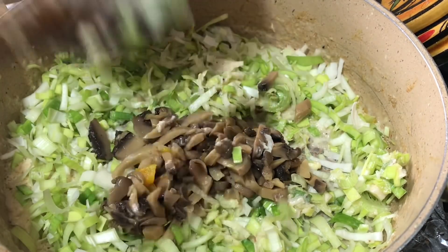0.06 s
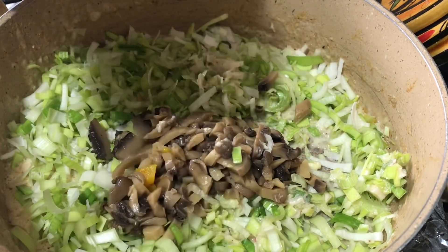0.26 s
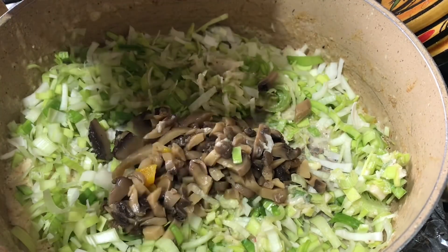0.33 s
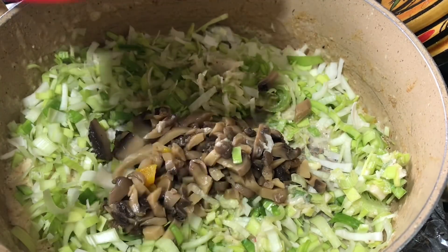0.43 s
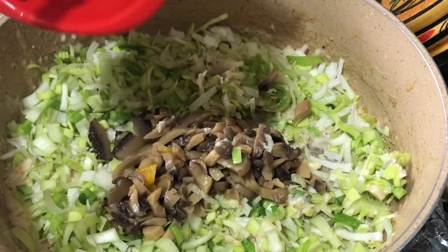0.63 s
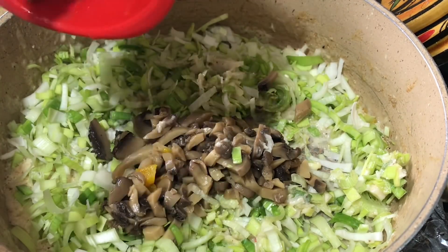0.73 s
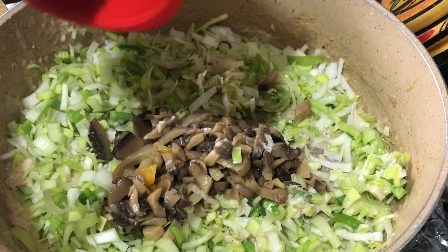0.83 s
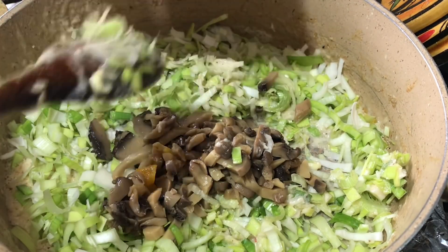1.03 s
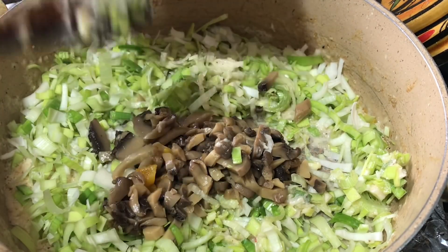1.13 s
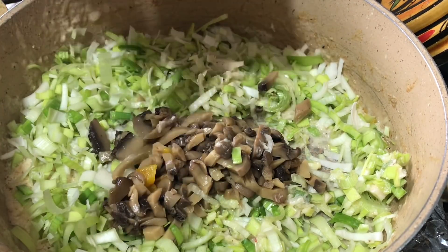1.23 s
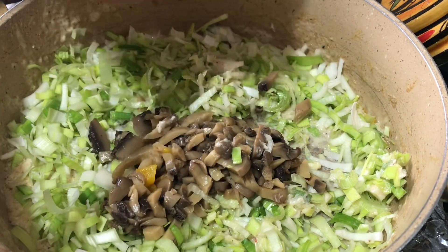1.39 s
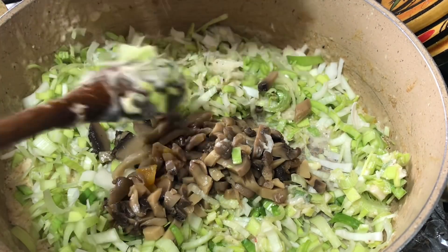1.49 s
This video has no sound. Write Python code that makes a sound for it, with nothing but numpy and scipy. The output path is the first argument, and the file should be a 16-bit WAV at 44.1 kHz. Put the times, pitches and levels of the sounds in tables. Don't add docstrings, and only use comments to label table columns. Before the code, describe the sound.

A wooden spoon knocks twice on a heavy pan rim over faintly sizzling vegetables

```python
import sys
import numpy as np
from scipy import signal
from scipy.fft import rfft, irfft, next_fast_len
from scipy.io import wavfile
from scipy.ndimage import map_coordinates

SR = 44100
rng = np.random.default_rng(int(sys.argv[2]) if len(sys.argv) > 2 else 0)


def to_wav(s):
    ch = np.atleast_2d(s).T
    pcm = np.round(np.clip(ch, -1, 1) * 32767)
    wavfile.write(sys.argv[1], SR, pcm.astype(np.int16))


def ratio_of_db(decibels):
    return 10 ** (np.asarray(decibels, float) / 20)


N = 68355


def unit(x):
    return x / np.sqrt(np.mean(x ** 2) + 1e-20)


def along(points, hz):
    point_hz, value = np.transpose(points)
    return np.interp(np.log(hz + 1), np.log(point_hz + 1), value)


def curves(rows):
    time_s, *columns = np.transpose(rows)
    return [np.interp(np.arange(N) / SR, time_s, column) for column in columns]


def wobble(rate):
    return map_coordinates(rng.standard_normal(64), [np.arange(N) * rate / SR])


def noise():
    return rng.standard_normal(N)


def coloured(x, points):
    size = next_fast_len(N + 8192)
    gain = ratio_of_db(along(points, np.fft.rfftfreq(size, 1 / SR)))
    return irfft(rfft(x, size) * gain, size)[:N]


def spoon():
    # start_s, peak_db, spot on the rim (0-1), contact_s, crack_db
    knocks = [
        (0.2235, -1.5, 0, 0.0013, -33),
        (1.263, -3, 1, 0.00098, -36.5),
    ]
    # pitch_hz, level_db at one spot, level_db at the other, t60_s
    wood = [(155, -30.5, -27.5, 0.091), (252.5, -28, -30, 0.1), (570, -13, -13.5, 0.06),
            (802, -6.5, -17, 0.02), (957, -24, -29, 0.096), (1075, -9.5, -10, 0.026),
            (1155, -0.5, -1.5, .016), (1176, -23, -16, 0.036), (1287, -10.5, -15, 0.011),
            (1503, -23.5, -23, 0.025), (1754, -24, -31.5, 0.031), (1882, -24.5, -26.5, 0.038),
            (2140, -28, -27.5, 0.019), (2545, -19.5, -24.5, 0.016)]
    # pitch_hz, level_db at one spot, level_db at the other, t60_s
    rim = [(4135, -4.5, -7, 0.022), (4370, -11, 2, 0.013), (5280, -7.5, -9.5, 0.021),
           (6000, -22, -1.5, 0.012), (6530, 1, -5.5, 0.011), (8200, -3, -10, 0.0068),
           (11500, -11, -20, .008)]
    # pitch_hz, level_db at one spot, level_db at the other, t60_s
    tap = [(590, -41.5, -44, 0.089), (860, -31.5, -32, 0.0066), (1120, -43.5, -43, 0.022)]
    # delay_s, level_db
    walls = [(.0135, -15.5), (.021, -27.5), (.033, -28.5), (.045, -25)]
    tap_s, room_delay_s, room_db = 0.589, 0.007, -14.5
    grit_db, grit_t60_s = -9, 0.0082

    out = np.zeros(N + SR)
    t = np.arange(SR // 4) / SR
    for start_s, peak_db, spot, contact_s, crack_db in knocks:
        body = ratio_of_db(peak_db) * ring(wood, t, spot, contact_s)
        grit = np.diff(rng.standard_normal(len(t) + 1)) * ratio_of_db(grit_db - 60 * t / grit_t60_s)
        crack = ratio_of_db(crack_db) * (grit + ring(rim, t, spot, contact_s=0.00061))
        blow = crack - body
        for delay_s, level_db in [(0, 0.012)] + walls:
            first = round((start_s + delay_s * (1 + 0.1 * spot)) * SR)
            out[first:][:len(t)] += ratio_of_db(level_db) * blow
        echo = ratio_of_db(room_db) * kitchen(blow)
        out[round((start_s + room_delay_s) * SR):][:len(echo)] += echo
    out[round(tap_s * SR):][:len(t)] -= ring(tap, t, spot=0, contact_s=0.00019)
    return signal.lfilter(*signal.butter(2, 110, "high", fs=SR), out[:N])


def ring(modes, t, spot, contact_s):
    out = 0
    for pitch_hz, one_db, other_db, t60_s in modes:
        swell_s = contact_s * max(1, 1000 / pitch_hz)
        swell = 1 - np.exp(-(t / swell_s) ** 2)
        decay = ratio_of_db(one_db + (other_db - one_db) * spot - 60 * t / t60_s)
        out = out + decay * swell * np.sin(2 * np.pi * pitch_hz * t)
    return out


def kitchen(x):
    # pitch_hz, t60_s, level_db
    room = [(200, 0.11, -5), (600, .14, -5), (800, 0.2, 2), (1200, 0.31, -3), (1720, 0.28, 10.5),
            (2500, 0.17, 3), (5300, 0.13, 5.5)]
    hz, t, bands = signal.stft(rng.standard_normal(SR // 3), SR, nperseg=256)
    t60_s = along([(row[0], row[1]) for row in room], hz)[:, None]
    level_db = along([(row[0], row[2]) for row in room], hz)[:, None]
    tail = signal.istft(bands * ratio_of_db(level_db - 60 * t / t60_s), SR, nperseg=256)[1]
    return signal.fftconvolve(x, tail / np.linalg.norm(tail))


def spits():
    # start_s, peak_db, t60_s, lowest_hz
    snaps = [(.0064, -45.5, 0.004, 5000), (0.11, -39.5, 0.0036, 4500), (0.2597, -35.5, 0.0052, 5000),
             (0.3414, -41.5, .004, 5000), (0.402, -38, .004, 7000), (.4264, -29, 0.0066, 4300),
             (.472, -44, 0.0039, 4000), (.4935, -37, 0.0098, 11500), (0.5892, -34, 0.0083, 4000),
             (.6679, -46, .004, 5000), (.7657, -42.5, 0.0036, 5000), (0.95, -40, .005, 9000),
             (1.092, -42, .004, 6000), (1.2291, -38, .004, 3500), (1.239, -47, 0.0037, 8000),
             (1.4354, -41, .004, 6000)]
    snap_db, top_hz = 12.5, 11700

    out = np.zeros(N + SR)
    t = np.arange(SR // 50) / SR
    for start_s, peak_db, t60_s, lowest_hz in snaps:
        spray = rng.choice([-1, 1], size=len(t)) * ratio_of_db(-60 * t / t60_s)
        spray[0] += ratio_of_db(snap_db)
        bright = signal.lfilter(*signal.butter(3, lowest_hz, "high", fs=SR), spray)
        out[round(start_s * SR):][:len(t)] += ratio_of_db(peak_db - 4) * bright
    return signal.lfilter(*signal.butter(1, top_hz, fs=SR), out[:N])


def pan():
    # pitch_hz, level_db per Hz
    sizzle = [(2200, 14), (3300, 0.5), (4300, 4), (5000, -3), (9500, -9.5), (10400, -22), (12000, -11),
              (15500, -23)]
    # pitch_hz, level_db per Hz
    steam_colour = [(2300, -27), (2900, 1), (3500, -6), (4300, 0), (5000, -9.5), (6500, -9), (8000, -35)]
    # time_s, level_db
    frying = [(0, -68.5), (.4, -67.5), (.9, -62.5), (1.55, -61)]
    bubbles_per_s, size_spread_db, bubbles_db, sizzle_db = 190, 4, -1.5, -58.85

    bursts = np.zeros(N)
    place, size = rng.random((round(bubbles_per_s * N / SR), 2)).T
    bursts[(place * N).astype(int)] = ratio_of_db(-size_spread_db * np.log(size + 1 / 50))
    burst_decay = ratio_of_db(-60 * np.arange(200) / SR / 0.004)
    bubbles = np.convolve(bursts, burst_decay)[:N] * noise()
    hiss = ratio_of_db(0.47 * wobble(15.6)) * noise()
    fizz = unit(coloured(hiss + ratio_of_db(bubbles_db) * unit(bubbles), sizzle))
    steam = ratio_of_db(curves(frying)[0]) * unit(coloured(noise(), steam_colour))
    return ratio_of_db(sizzle_db) * fizz + steam


def motor():
    # time_s, turns per second
    speed_curve = [(0, 73.9), (.1, 74.25), (.3, 75.0), (.5, 75.2), (.8, 75.75), (1.0, 75.8), (1.2, 75.65),
                   (1.55, 76.2)]
    # time_s, level_db
    whine_curve = [(0, -62.5), (.2, -61), (.3, -52.5), (.5, -58.5), (.8, -57.5), (1.0, -61), (1.2, -62),
                   (1.4, -59), (1.55, -58)]
    # time_s, centre_hz, width_hz
    housing = [(0, 2100, 110), (.15, 2120, 80), (.28, 2175, 40), (.52, 2175, 42), (.65, 2120, 70),
               (.9, 2100, 60), (1.1, 2160, 80), (1.55, 2150, 110)]
    # multiple of the shaft speed, level_db
    low_orders = [(2, -64), (3, -67), (6, -76), (10, -76), (15, -75), (22, -75), (23, -74), (39, -78)]
    # time_s, level_db
    eighth_curve = [(0, -66.5), (.4, -63), (1.05, -62.5), (1.2, -67.5), (1.55, -70.5)]
    wander_db, wander_per_s, slip_rad, skirt_db = 4, 11, 0.9, -9

    speed, = curves(speed_curve)
    angle = 2 * np.pi * np.cumsum(speed) / SR

    def line(order, level_db):
        level = np.sqrt(2) * ratio_of_db(level_db + wander_db * wobble(wander_per_s))
        return level * np.sin(order * angle + slip_rad * wobble(12))

    whine_db, = curves(whine_curve)
    centre_hz, width_hz = curves(housing)
    whine = 0
    for order in range(24, 33):
        resonance = 1 / (1 + ((order * speed - centre_hz) / width_hz) ** 2)
        skirt = ratio_of_db(skirt_db) / (1 + ((order - 28.5) / 2.0) ** 4)
        whine = whine + (resonance + skirt) * line(order, whine_db - 2)
    low = sum(line(order, level_db) for order, level_db in low_orders)
    eighth_db = curves(eighth_curve)[0] + 0.5 * wobble(7.3)
    eighth = np.sqrt(2) * ratio_of_db(eighth_db) * np.sin(8 * angle)
    return whine + low + eighth


def room_tone():
    # pitch_hz, level_db per Hz
    rumble_colour = [(25, -53), (45, -11), (62, 0), (100, -13.5), (140, -5.5), (185, -16.5), (250, -9),
                     (330, -25), (600, -66)]
    # pitch_hz, level_db per Hz
    air_colour = [(200, -7), (400, -6.5), (800, -3.5), (990, 4), (1300, -4), (2100, 1.5), (2700, -6),
                  (4000, -15)]
    rumble_db, air_db = -52.5, -54.5
    rumble = ratio_of_db(0.9 * wobble(8.7)) * unit(coloured(noise(), rumble_colour))
    air = ratio_of_db(0.85 * wobble(4.06)) * unit(coloured(noise(), air_colour))
    return ratio_of_db(rumble_db) * rumble + ratio_of_db(air_db) * air


def scene():
    return (spoon() + spits() + pan() + motor() + room_tone())[None]


def top_cut(x):
    return signal.sosfilt(signal.butter(12, 16510, fs=SR, output="sos"), x)


def record(dry):
    # pitch_hz, level_db
    mic = [(20, 0), (15600, 0), (15850, -14), (16450, -18), (16540, -90)]
    mix = coloured(dry[0], mic)[None]
    return top_cut(mix)


dry = scene()
out = record(dry)
to_wav(out)
```